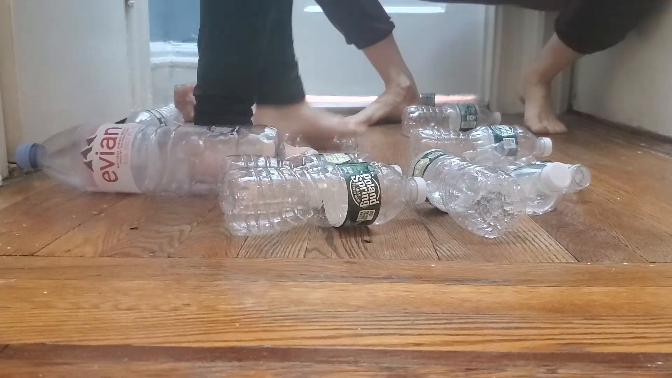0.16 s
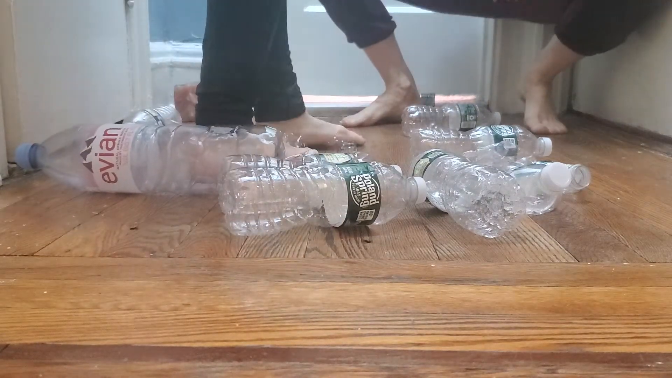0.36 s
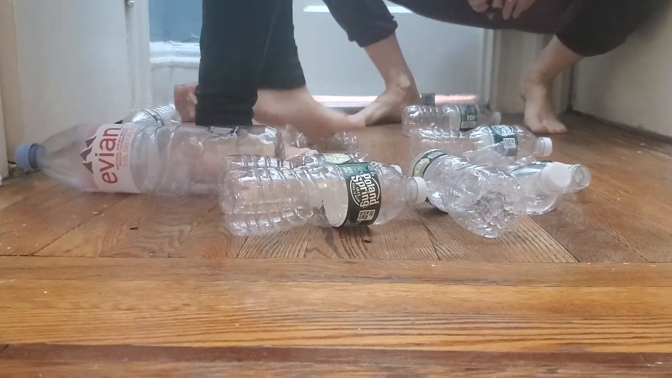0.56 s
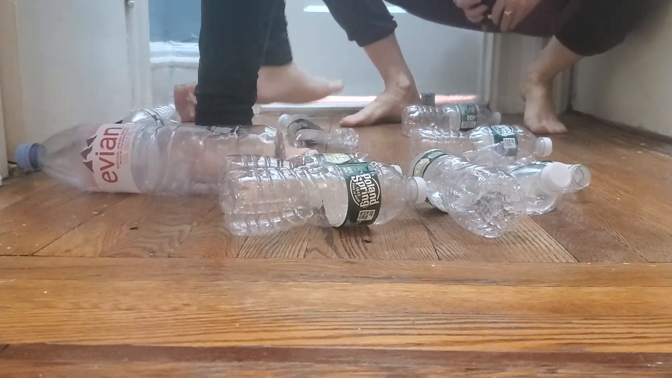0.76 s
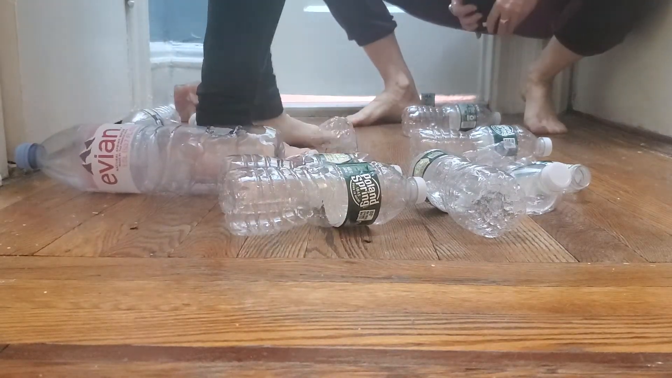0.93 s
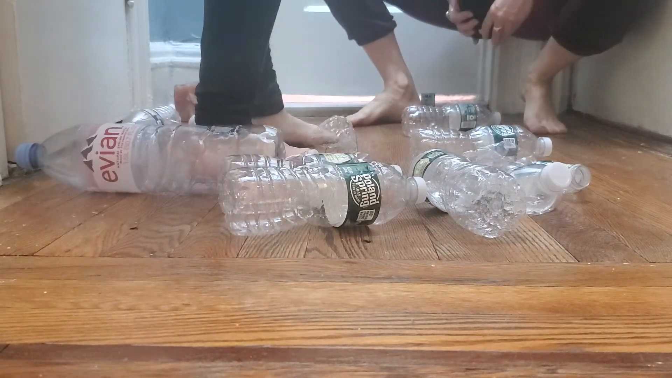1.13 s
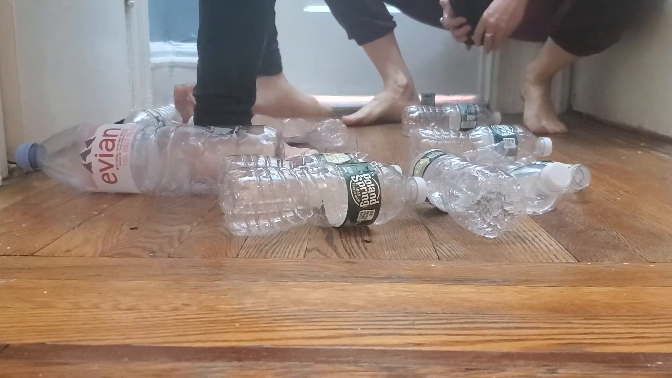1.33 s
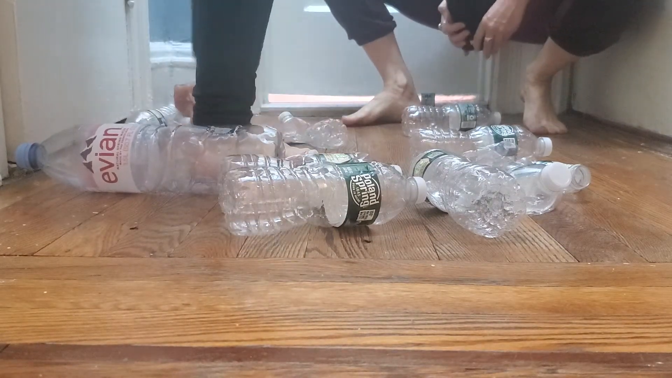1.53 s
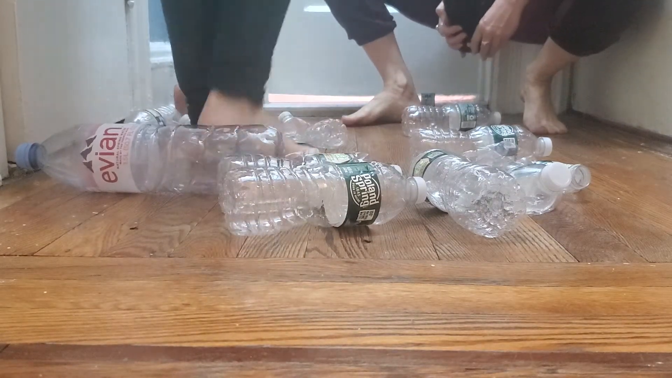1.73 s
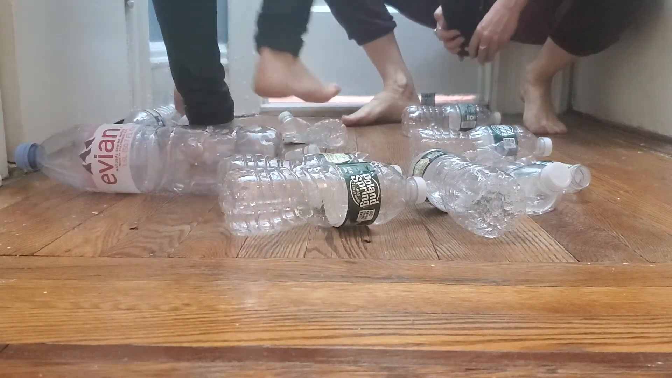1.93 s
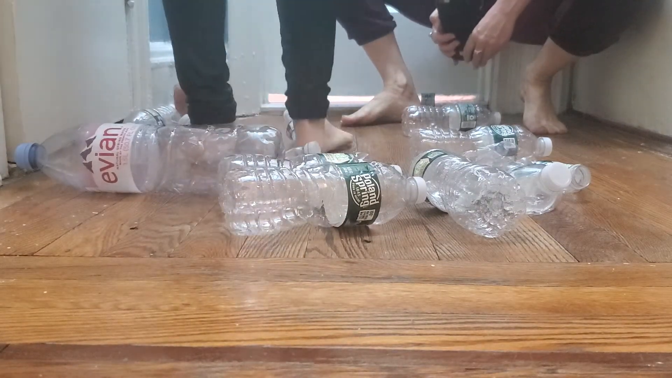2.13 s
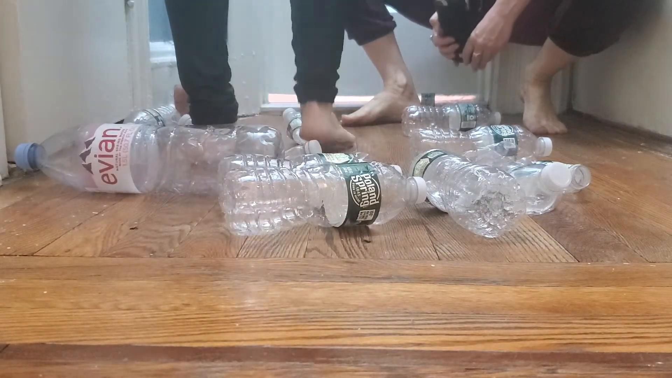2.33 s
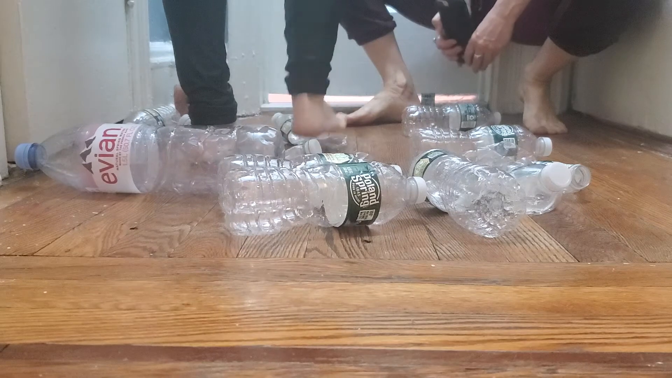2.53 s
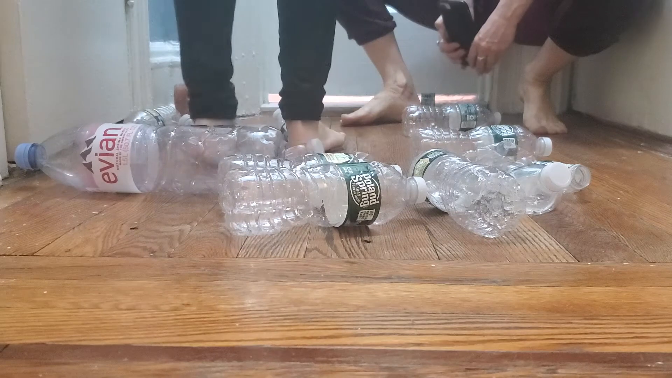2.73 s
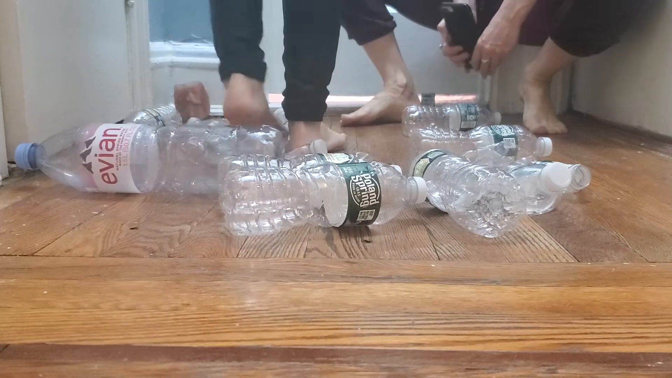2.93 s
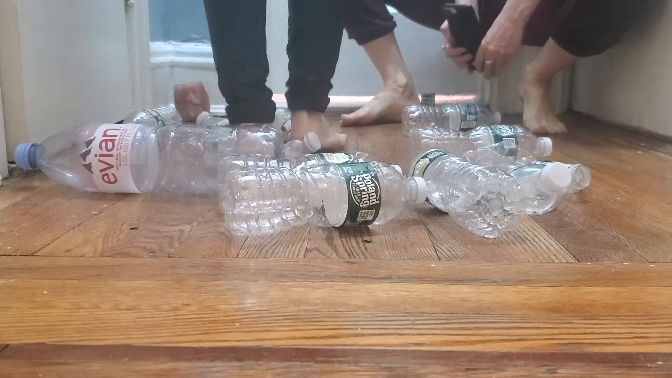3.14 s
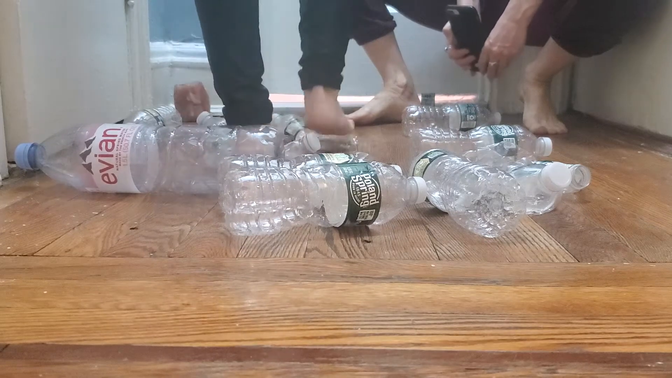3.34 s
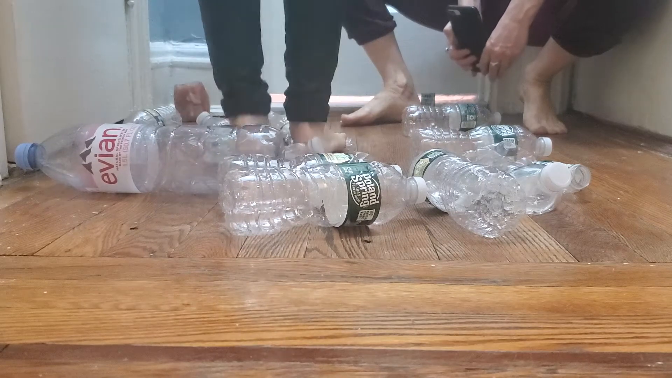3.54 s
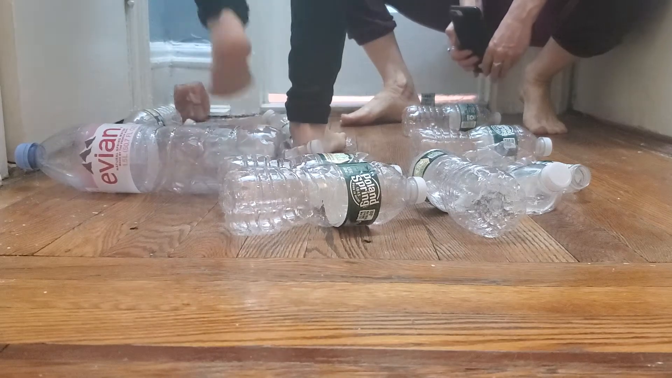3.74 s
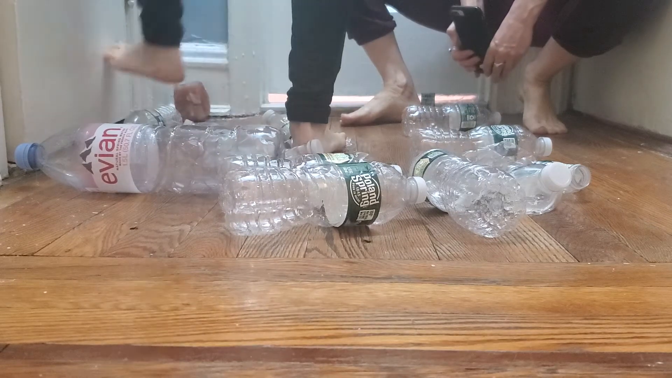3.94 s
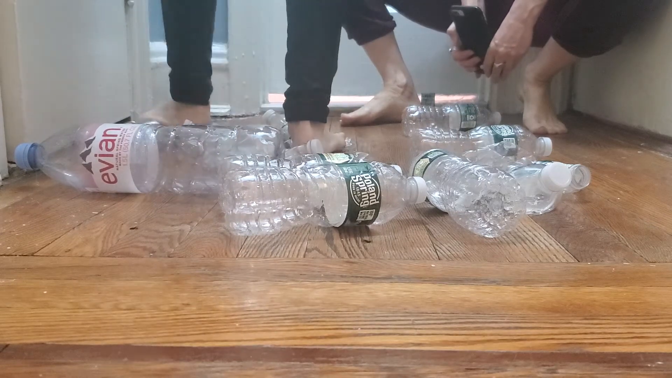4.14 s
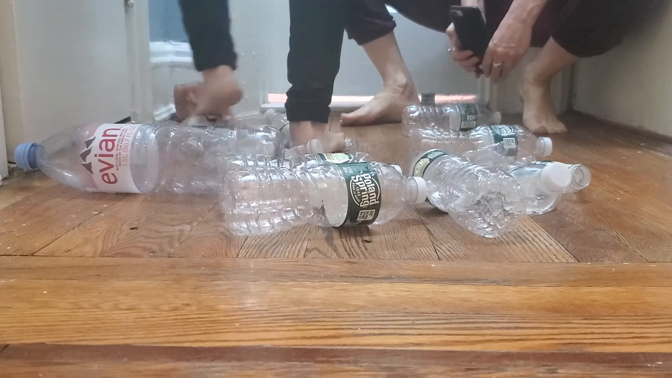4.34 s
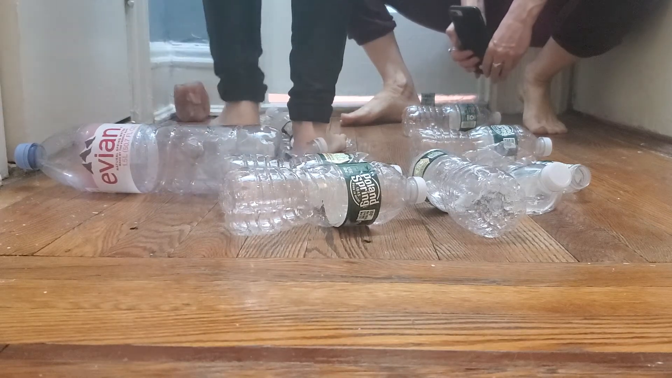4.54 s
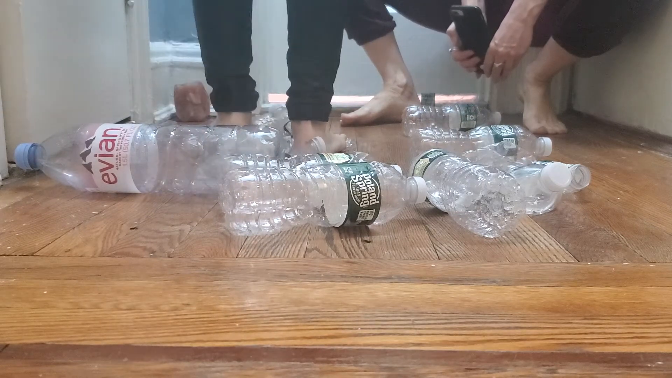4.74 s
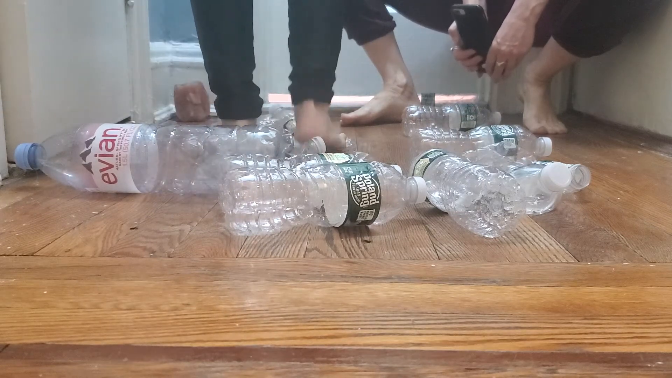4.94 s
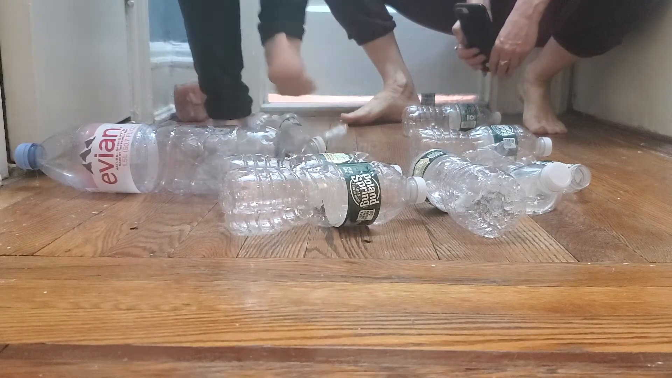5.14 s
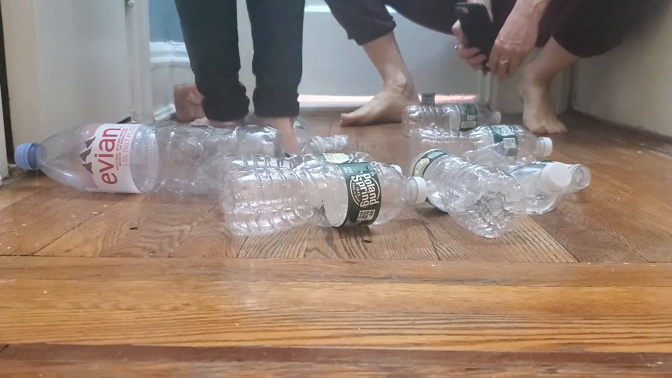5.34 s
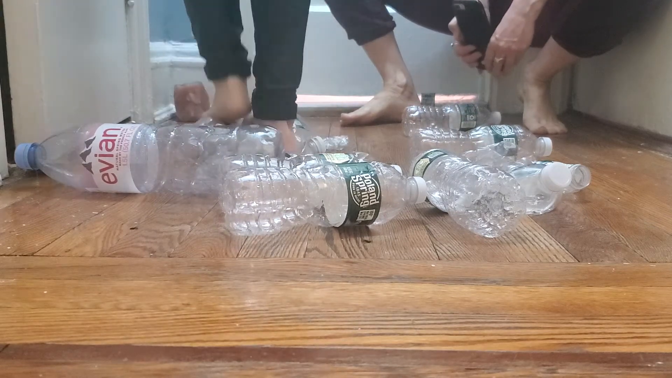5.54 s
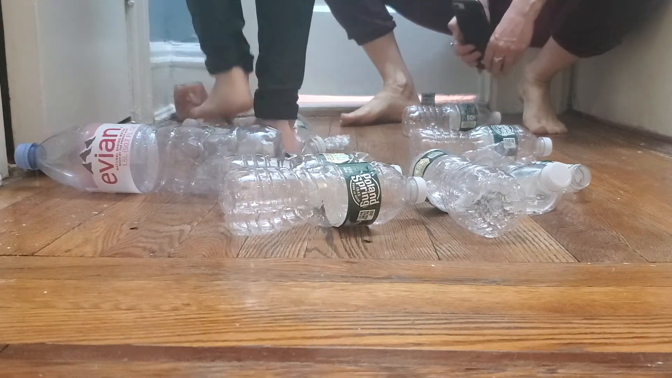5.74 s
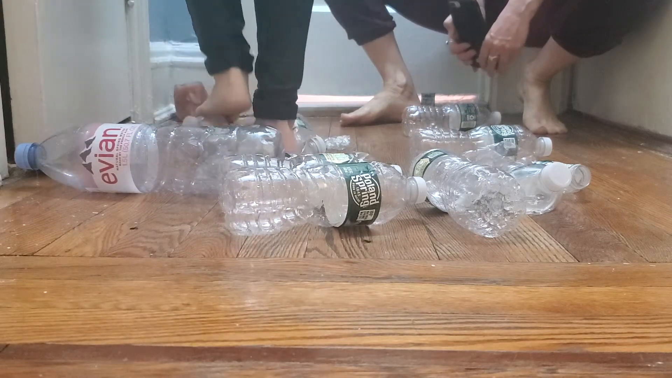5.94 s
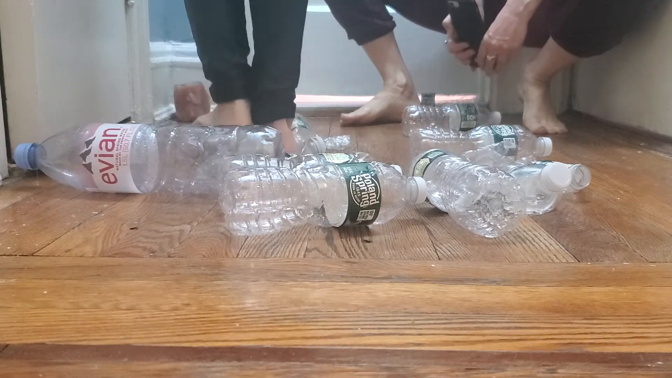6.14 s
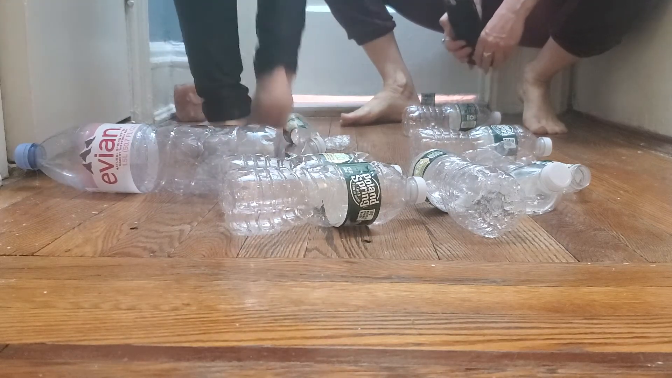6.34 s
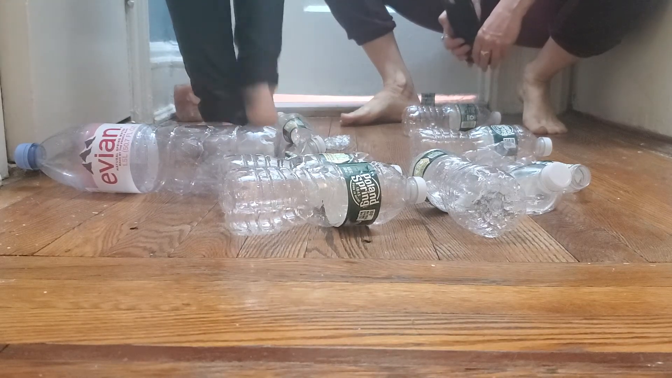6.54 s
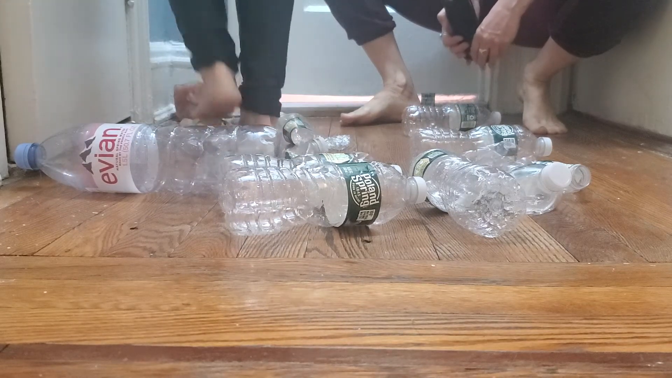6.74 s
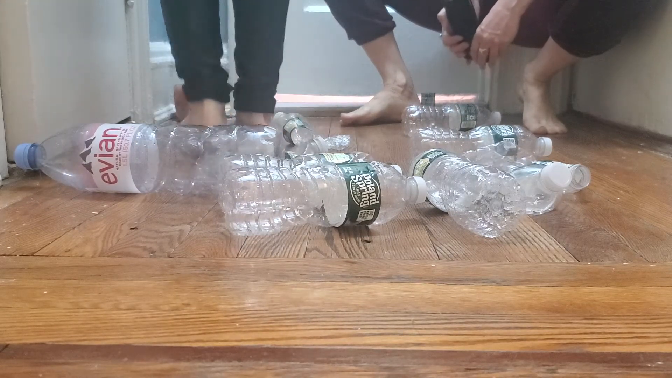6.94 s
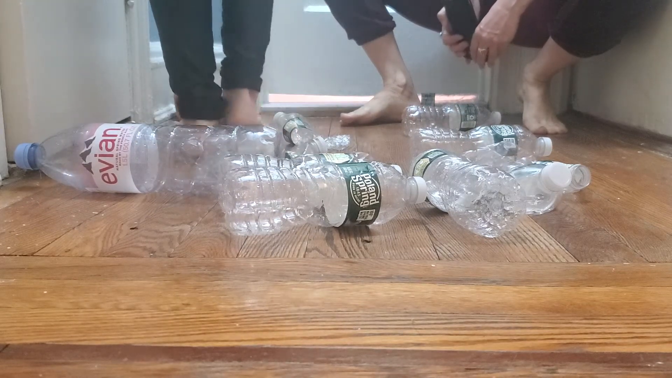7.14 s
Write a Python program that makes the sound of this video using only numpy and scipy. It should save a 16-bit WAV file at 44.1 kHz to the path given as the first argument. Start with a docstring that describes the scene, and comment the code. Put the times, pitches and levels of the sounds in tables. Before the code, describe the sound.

Thin empty plastic bottles crunch and pop underfoot in uneven bursts, with hollow ringing flips, dull floorboard thumps and a faint room rumble.

```python
"""Thin plastic crackles in swarms of tiny clicks and single loud snaps as bare feet tread empty bottles.
Clicks and snaps excite band-wise noise responses of the shell and of a small hard-walled room.
Some panels ring as they flip: clusters of close, decaying sines. Heels bottom out on a wooden floor
with a thud: short pushes into resonant modes. Low rumble and faint hiss, shaped noise, lie beneath.
Two microphone ports colour the sound, each in its own way."""
import sys
import numpy as np
from scipy import signal
from scipy.fft import rfft, irfft
from scipy.io import wavfile
from scipy.ndimage import uniform_filter1d

SR = 44100
rng = np.random.default_rng(int(sys.argv[2]) if len(sys.argv) > 2 else 0)


def master_out(mix):
    """Clip the mix to full scale and print it as 16-bit PCM to the path in sys.argv[1]."""
    frames = np.transpose(np.atleast_2d(mix))
    ceiling = np.clip(frames, -1, 1)
    pcm = np.round(ceiling * 32767).astype(np.int16)
    wavfile.write(sys.argv[1], SR, pcm)


N = 321048

# likeness of left and right in a diffuse field: freq_hz, correlation
PORT_LIKENESS = [(120, 0.98), (300, 0.72), (700, 0.55), (1500, 0.2), (3000, 0.067), (15000, 0.019)]


def bottles(colour_db=4.0, snap_colour_db=1.5, direct_db=-9.0, room_db=-8.5, snap_direct_db=-12.0,
            snap_room_db=-10.0, flip_db=-3.5, snap_flip_db=-2.0, count=7):
    """Each buckle strikes the shell with a colour of its own; the room answers band by band."""
    # single loud buckles: start_s, level_db, hollow_db, sharp_db
    snaps = [(0.1062, -45, 18.5, -8.5), (0.1778, -32, 12, -20), (0.2053, -14, 5, -4.5),
             (0.405, -23, -14.0, -3.5), (0.4799, -21.0, 1.0, 5.5), (0.582, -28, -11.0, 7.5),
             (0.6035, -22, -21, 1.5), (0.6927, -22.5, -6, -14.5), (0.7456, -14.5, -18, -13.5),
             (0.842, -36, -11.5, 0), (0.865, -18, 0, 0), (0.899, -14, 8.5, 1), (0.951, -12, -4, -2.5),
             (1.2702, -25.5, -1.5, 1), (1.288, -18, 1.0, -7), (1.5072, -40.5, -8, -1.5),
             (1.5876, -26, 12.5, 14.5), (1.6292, -10.5, -5.5, -2.5), (1.7825, -32.5, -17, 14),
             (1.8474, -23, -6.5, 3), (2.078, -23.5, 7, -2), (2.2217, -24.5, 2, -0.5),
             (2.2898, -14, 1.5, -12.5), (2.4156, -26.5, 3, 9), (2.6035, -29, 9.5, 2), (2.631, -24, 0, 2),
             (2.717, -24, -1.5, 6), (2.8192, -28, 2, 7), (3.0123, -31, 11, -1.5), (3.0231, -25.5, 6, 2),
             (3.1067, -18.5, 2.5, -21), (3.4162, -30.5, -1, -3.5), (3.521, -21.5, -9, 4.0),
             (3.6512, -28.5, 11.5, 7.5), (3.7803, -22.5, -3.5, 4.0), (3.8607, -26.5, -12.5, 0.5),
             (3.92, -32.5, 5.0, -2), (4.054, -38, 14, -4.5), (4.0713, -16.5, -4, 6.5),
             (4.3113, -15, -13, -2.5), (4.375, -23, 10.5, -4.5), (4.9029, -34, -3.5, 15),
             (4.942, -17.5, -30, -8.5), (5.002, -19.0, -6, -11), (5.0907, -24.5, -2.5, 8),
             (5.2832, -16, -9.5, 0.5), (5.4334, -18, -15, 4.5), (5.728, -18.5, -8.5, -18),
             (5.7517, -13, -16.5, -13.5), (5.8291, -39, -1, 16), (5.9262, -24.5, -22, -1.5),
             (6.0806, -32.5, -14, -5.0), (6.1218, -20.5, -30, 3), (6.2374, -22, -0.5, 11.0),
             (6.338, -13.5, -17, -2.0), (6.5339, -30.5, -5.5, -2), (6.5805, -30.5, -2.5, 3.5),
             (6.6271, -18.0, -16, -1), (6.775, -20, -26, 3.5), (7.004, -31.5, -15.5, 9),
             (7.1505, -27.5, -5, 7)]
    click_t60_s, snap_t60_s = .011, .032
    band_centres_hz = 1000 * 2 ** (np.arange(-13, 13) / 3)

    click_at, click_db = crackle()
    in_or_out = rng.choice([-1, 1], len(click_at))
    snap_s, *snap_colour = np.transpose(snaps)
    snap_at = (snap_s * SR).astype(int)
    snap_db = range_levels(*snap_colour)
    snap_size = np.sqrt(.01 * SR)  # table levels refer to 10 ms

    out = np.zeros((2, N))
    for hz in band_centres_hz:
        rooms = room_responses(hz, count)

        colour = colour_db * rng.standard_normal(len(click_at))
        clicks = np.zeros(N)
        clicks[click_at] = in_or_out * from_db(strength_db(click_db, hz) + colour)
        near = from_db(direct_db) * shell_responses(hz, click_t60_s, flip_db, count)
        out += swarm(clicks, near, from_db(room_db) * rooms)

        # successive snaps cycle through the spots of the shell
        colour = snap_colour_db * rng.standard_normal(len(snaps))
        sizes = snap_size * from_db(strength_db(snap_db, hz) + colour)
        shells = shell_responses(hz, snap_t60_s, snap_flip_db, count)
        for k, (start, size) in enumerate(zip(snap_at, sizes)):
            add(out, start, size * from_db(snap_direct_db) * shells[k % count])
            add(out, start, size * from_db(snap_room_db) * rooms[k % count])
    return out


def crackle(per_s=260, crowding=.3, size_db=3.0, share_s=.028):
    """Small buckles come at random, thicker under pressure: their samples and three strengths in dB."""
    s, ranges_db = foot_pressure()
    sample_s = np.arange(N) / SR
    pressure_db = np.transpose([np.interp(sample_s, s, r) for r in ranges_db.T])
    # per_s is the rate at a wall strength of -28 dB
    rate = per_s * from_db(crowding * (pressure_db[:, 1] + 28))
    at = np.flatnonzero(rng.random(N) < rate / SR)
    power = np.zeros(N)
    power[at] = from_db(size_db * np.minimum(rng.exponential(1, len(at)), 4)) ** 2
    # buckles close in time share the work that the foot does
    shared = uniform_filter1d(power, int(share_s * SR))
    share_db = 10 * np.log10(power[at] / shared[at])
    return at, pressure_db[at] + share_db[:, None]


def foot_pressure():
    """Body, wall and crease strengths in dB, each ms: crumples build, swell under weight, stop, settle."""
    # a stretch of bottle gives way under the foot: start_s, length_s, level_db, hollow_db, sharp_db
    crumples = [(0.0, 0.0049, -36.5, 4, 1), (0.216, 0.048, -22, 1.5, 0.5), (0.43, 0.084, -33.5, -4.5, 2),
                (0.578, 0.073, -31.0, -3.5, -13), (0.691, 0.044, -46.5, 15.5, -16),
                (0.873, 0.083, -22.0, 1.5, -3.5), (0.987, 0.14, -33, -4, -5.0),
                (1.159, 0.033, -29.0, -1.5, 3.5), (1.57, 0.023, -32.5, 6.5, -7),
                (1.613, 0.032, -19.0, -7, -7.5), (1.685, 0.11, -32, -2.5, -5.5),
                (1.851, 0.037, -31.0, -17, -8), (2.092, 0.047, -19.5, 1.5, -1.5),
                (2.15, 0.15, -33.5, -23, -19), (2.363, 0.028, -47.5, 6.0, 6),
                (2.42, 0.029, -30.0, -3.5, -0.5), (2.624, 0.021, -26.5, 0, -1), (2.69, 0.1, -31.0, -8, -7),
                (2.833, 0.038, -30.5, 3, 2.5), (2.963, 0.041, -47, 15, 2.5), (3.029, 0.069, -27.0, 3.5, 0),
                (3.107, 0.081, -25, -6.5, 2), (3.193, 0.095, -31, -7.5, 0.5), (3.429, 0.046, -32.5, 3, 1),
                (3.519, 0.15, -29.0, -3, 0.5), (3.732, 0.086, -41.5, -3, -18),
                (4.069, 0.065, -23.5, -5, -2.5), (4.213, 0.078, -29.5, -2, -3),
                (4.307, 0.07, -21.5, -5.5, -5.0), (4.416, 0.068, -22.5, -1.5, -1.5),
                (4.523, 0.062, -24, -7.5, 1.5), (4.669, 0.056, -23.5, -8.5, -0.5),
                (4.765, 0.035, -25, -4.5, -15.5), (4.899, 0.079, -31.0, -6, -2.5),
                (4.973, 0.07, -32, -0.5, 0.5), (5.034, 0.021, -24, -24, -12.5),
                (5.128, 0.11, -28.5, 0.5, -5.5), (5.334, 0.053, -27.5, 2.0, 1.5),
                (5.43, 0.14, -25.5, -8.5, -2.5), (5.683, 0.17, -39.5, -7, -1.0),
                (6.101, 0.12, -33.5, -7.5, 2.5), (6.239, 0.029, -23.0, -5, -3),
                (6.325, 0.074, -24, -14, -5), (6.597, 0.06, -24.5, -10.5, -9.5),
                (6.736, 0.042, -27.5, -8.5, -4), (6.865, 0.044, -33.5, -13, -3.5),
                (6.941, 0.13, -35.0, -8, 2.5), (7.085, 0.073, -32, -6, -4), (7.204, 0.2, -37.5, -7.5, -20)]
    build_db_per_s, swell_db, stop_db_per_s = 683, 2.5, 619
    settle_db, settle_db_per_s = -23, 180  # the creased plastic settles far more quietly

    t = np.arange(0, N / SR, .001)
    start_s, length_s, *colour = np.transpose(crumples)
    age = t[:, None] - start_s
    before = np.maximum(-age, 0)
    after = np.maximum(age - length_s, 0)
    swell = swell_db * (np.clip(age / length_s, 0, 1) - .5)
    attack = from_db(swell - build_db_per_s * before)
    stop = from_db(-stop_db_per_s * after)
    settle = from_db(settle_db - settle_db_per_s * after)
    release = np.maximum(stop, settle)
    power = (attack * release) ** 2 @ from_db(range_levels(*colour)) ** 2
    return t, 10 * np.log10(power + 1e-12)


def range_levels(level_db, hollow_db, sharp_db):
    """Body, wall and crease strengths: trapped air makes a buckle hollow, a tight fold makes it sharp."""
    return np.stack([level_db + hollow_db, level_db, level_db + sharp_db], axis=-1)


def strength_db(ranges_db, hz):
    """Blend the body, wall and crease strengths of each buckle for one band."""
    # centres of body, wall and crease sound: freq_hz
    ranges_hz = [640, 3360, 10100]
    # colour of every buckle, relative to the strength of its range: freq_hz, third_octave_db
    plastic = [(60, -5), (125, 4.5), (250, -4.5), (400, -2.5), (500, 1), (630, -2.5), (1100, 1), (2000, -1),
               (2600, -1), (3400, 0), (5000, -2), (10000, -0.5), (15000, -3.5)]
    rows = np.eye(len(ranges_hz))
    weights = [np.interp(np.log(hz), np.log(ranges_hz), row) for row in rows]
    return ranges_db @ weights + at_hz(plastic, hz)


def shell_responses(hz, t60_s, flip_db, count):
    """A wall flips with one sharp pulse, then crowded, damped modes ring; one band, several spots."""
    t = np.arange(SR // 20) / SR
    response = unit_energy(stereo_noise(hz, len(t), count) * from_db(-60 * t / t60_s))
    # the pulse reaches the right port two samples later with each further spot
    response[:, 0, 0] += from_db(flip_db)
    response[np.arange(count), 1, 2 * np.arange(count)] += from_db(flip_db)
    return unit_energy(third_octave(response, hz))


def swarm(clicks, near, room, count=48):
    """The bottle deforms as it gives way, so stretches of clicks take the modes and paths in turn."""
    responses = room.copy()
    responses[..., :near.shape[-1]] += near
    stretches = np.pad(clicks, (0, -N % count)).reshape(count, 1, -1)
    spots = np.arange(count) % len(responses)
    sounds = signal.fftconvolve(stretches, responses[spots], axes=2)
    out = np.zeros((2, N))
    for k, sound in enumerate(sounds):
        add(out, k * stretches.shape[-1], sound)
    return out


def panels(room_db=0.0, spread=0.056, count=5):
    """A flipping panel rings in close modes, each port in phases of its own; the room rings on."""
    # panels that ring as they flip: start_s, pitch_hz, level_db, t60_s
    flips = [(.109, 480, -25, .09), (.179, 560, -33, .07), (.235, 1070, -20, 0.058),
             (.618, 1640, -21, 0.11), (.64, 510, -24, .07), (.694, 462, -14, 0.075),
             (.728, 525, -16.5, .08), (.925, 506, -8, 0.052), (.951, 1153, -9.5, .09),
             (1.287, 2400, -21.5, 0.065), (1.567, 548.7, -19, .06), (1.612, 2401, -22, .04),
             (1.859, 2470, -20.5, .09), (2.094, 1127, -10, .17), (2.289, 818, -7.5, 0.031),
             (2.29, 584, -12.5, 0.027), (2.29, 1015, -10, .04), (2.452, 1020, -19, 0.08),
             (2.605, 539.6, -18.5, .2), (2.829, 504, -14, 0.066), (2.865, 550, -19, .06),
             (3.012, 569.4, -15, .15), (3.105, 844, -9, .03), (3.145, 1710, -15.5, 0.069),
             (3.268, 549.7, -22, 0.11), (3.437, 541.6, -19, .08), (3.625, 985, -18.5, .2),
             (4.455, 1683, -14.5, 0.078), (5.054, 3696, -16, 0.031), (5.36, 597.8, -18, 0.13),
             (5.36, 1095, -18, .06), (5.9247, 4240, -19, .015), (5.9258, 8250, -17, .025),
             (6.239, 1319, -15, .06), (6.255, 918.5, -14.5, 0.052)]
    out = np.zeros((2, N))
    t = np.arange(SR // 4) / SR
    for s, hz, db, t60_s in flips:
        offsets = spread * np.linspace(-1, 1, count)
        jitter = spread / count * rng.standard_normal(count)
        modes_hz = hz * (1 + offsets + jitter)
        phases = rng.uniform(0, np.pi, (2, 1, count))
        cluster = np.sin(2 * np.pi * t[:, None] * modes_hz + phases).sum(axis=-1)
        dying = from_db(db - 60 * t / t60_s)
        size = np.linalg.norm(dying) / 2
        tone = unit_energy(cluster * dying)
        room = room_responses(hz, count=1)[0]
        echo = unit_energy(signal.fftconvolve(tone, room, axes=1))
        add(out, int(s * SR), size * tone)
        add(out, int(s * SR), size * from_db(room_db) * echo)
    return out


def footfalls():
    """A soft heel pushes the boards: short contact wakes higher modes, only full weight the lowest."""
    # feet landing on the boards: start_s, level_db, contact_s, lowest_hz
    steps = [(0.252, -18.5, 0.0052, 40), (0.955, -17.5, 0.01, 36), (1.13, -26, 0.0083, 70),
             (1.63, -21.5, 0.0024, 70.5), (2.151, -19.5, 0.0094, 39.97), (2.655, -10.5, 0.0092, 36),
             (3.07, -27, 0.0035, 100), (3.508, -22, 0.012, 34), (3.973, -30.5, 0.0029, 80),
             (4.077, -24, 0.0053, 70.07), (4.369, -14, 0.0029, 150), (5.191, -34, 0.0023, 110),
             (5.559, -40, 0.0066, 50), (5.381, -30.5, 0.0038, 54.9), (6.341, -23.5, 0.014, 33.9),
             (6.641, -34.5, 0.0043, 71.6)]
    # modes of the wooden floor: pitch_hz, level_db, undamped t60_s
    boards = [(45, 17, 0.12), (64, 12.5, 0.42), (72, 29, 0.065), (96, 17.5, 0.36), (132.6, 11.5, 0.66),
              (200.62, 9, .2), (321.6, 1, .2)]
    force = np.zeros(N)
    for s, db, contact_s, lowest_hz in steps:
        push = np.pad(np.hanning(int(contact_s * SR)), (0, SR // 4))
        high_pass = signal.butter(2, lowest_hz, "high", fs=SR, output="sos")
        push = signal.sosfilt(high_pass, push / push.sum())
        add(force, int(s * SR), from_db(db) * push)

    out = np.zeros(N)
    for k, (hz, db, t60_s) in enumerate(boards):
        # the standing foot damps the boards: t60 is at most 30 cycles
        damped_t60_s = min(t60_s, 30 / hz)
        out += (-1) ** k * from_db(db) * ring(force, hz, damped_t60_s)
    return out


def ring(force, hz, t60_s):
    """A damped two-pole resonator: a unit click sets a sine of height about 1 ringing."""
    r = from_db(-60 / (t60_s * SR))
    w = 2 * np.pi * hz / SR
    return signal.lfilter([0, np.sin(w)], [1, -2 * r * np.cos(w), r * r], force + 1e-18)


def room_responses(hz, count, gap_s=0.0008, build_s=0.011):
    """Wall echoes in one band, from several places: they thicken after a short gap, then die away."""
    # reverberation: freq_hz, t60_s
    room_t60 = [(100, 0.54), (500, 0.37), (1200, 0.28), (3500, 0.28), (9000, 0.24), (15000, 0.17)]
    t = np.arange(SR // 3) / SR
    decay = from_db(-60 * t / at_hz(room_t60, hz))
    shape = np.clip((t - gap_s) / build_s, 0, 1) * decay
    return unit_energy(third_octave(stereo_noise(hz, len(t), count) * shape, hz))


def room_tone():
    """Low rumble of the building under a faint hiss: noise shaped in level and stereo likeness."""
    # quiet of the room: freq_hz, third_octave_db
    quiet = [(30, -82), (55, -39), (80, -37.5), (125, -38), (300, -63), (1000, -58.5), (4000, -65),
             (15000, -72)]
    hz = np.maximum(np.arange(N // 2 + 1) * SR / N, 1)
    band_width_hz = hz * (2 ** (1 / 6) - 2 ** (-1 / 6))
    mid, side = rfft(rng.standard_normal((2, N)))
    field = two_ports(hz, mid, side)
    density = from_db(at_hz(quiet, hz)) * np.sqrt(SR / 4 / band_width_hz)
    low_cut = np.minimum(hz / 30, 1) ** 2
    return irfft(field * density * low_cut, N)


def two_ports(hz, mid, side):
    """Mix sum and difference noise so that the ports are as alike as a diffuse field is at hz."""
    alike = np.clip(at_hz(PORT_LIKENESS, hz), -1, 1)
    return np.sqrt(1 + alike) * mid + np.sqrt(1 - alike) * side * [[1], [-1]]


def stereo_noise(hz, size, count):
    """Several draws of white noise at two ports, correlated as at hz."""
    mid, side = rng.standard_normal((2, count, 1, size))
    return two_ports(hz, mid, side)


def third_octave(x, hz):
    """Causal band-pass around hz."""
    edges_hz = hz * 2 ** (np.array([-1, 1]) / 6)
    return signal.sosfilt(signal.butter(2, edges_hz, "band", fs=SR, output="sos"), x)


def unit_energy(x):
    """Scale each channel to energy 1."""
    return x / np.sqrt(np.sum(x ** 2, axis=-1, keepdims=True) + 1e-20)


def from_db(db):
    """Decibels to gain."""
    return 10 ** (np.asarray(db) / 20)


def at_hz(points, hz):
    """Read a spectrum on a log-frequency axis."""
    f, value = np.transpose(points)
    return np.interp(np.log(hz), np.log(f), value)


def add(out, start, sound):
    """Mix a sound in from a given sample."""
    out[..., start:start + sound.shape[-1]] += sound[..., :N - start]


def scene():
    """Bottles, floor and room together."""
    return bottles() + panels() + footfalls() + room_tone()


def record(dry):
    """Each port has its own treble resonances; peaks are rounded and the top is cut."""
    # responses of the two microphone ports: freq_hz, gain_db
    left_port = [(28, -32), (45, -18), (100, -23), (700, -3), (2500, 2), (5000, 2.5), (6600, 0.5),
                 (7350, -1.5), (7950, 4), (9000, 1.5), (11000, 1), (15500, 3.5)]
    right_port = [(28, -37), (45, -26), (100, -27.5), (700, -9.5), (2700, -6), (5000, -7.5), (6600, -13.5),
                  (7900, -20), (9000, -6.5), (10300, 4.5), (12000, -1.5), (14000, -3), (16000, -18)]
    cutoff_hz = 15900
    hz = np.maximum(np.arange(N // 2 + 1) * SR / N, 1)
    gains = from_db([at_hz(left_port, hz), at_hz(right_port, hz)])
    coloured = irfft(rfft(dry) * gains, N)
    rounded = .9 * np.tanh(coloured / .9)
    low_pass = signal.ellip(12, .2, 80, cutoff_hz, fs=SR, output="sos")
    return signal.sosfilt(low_pass, rounded)


dry = scene()
out = record(dry)
master_out(out)
```